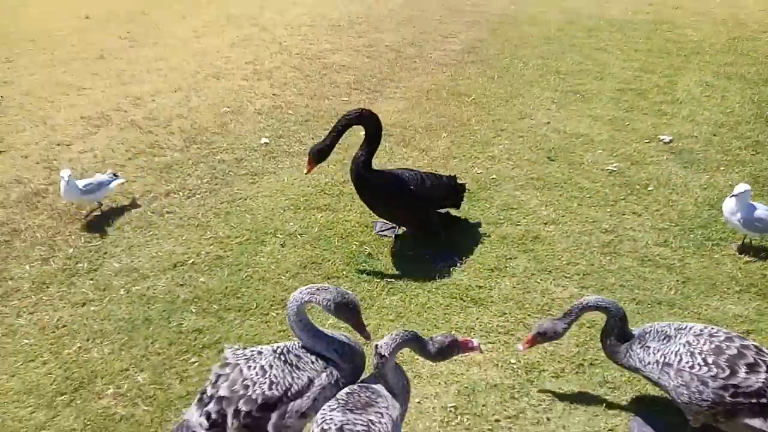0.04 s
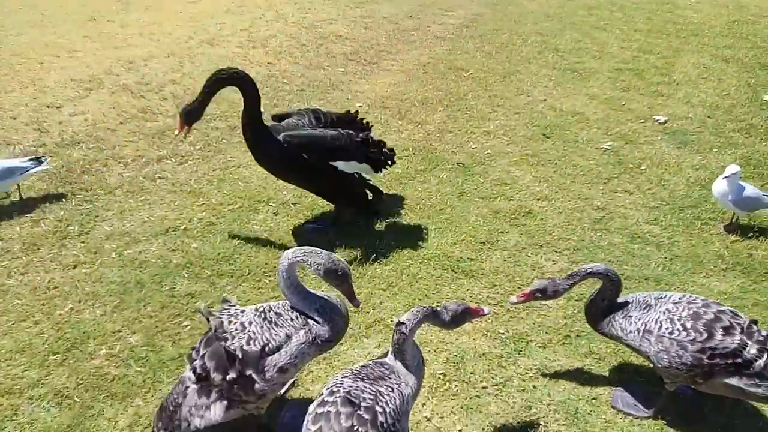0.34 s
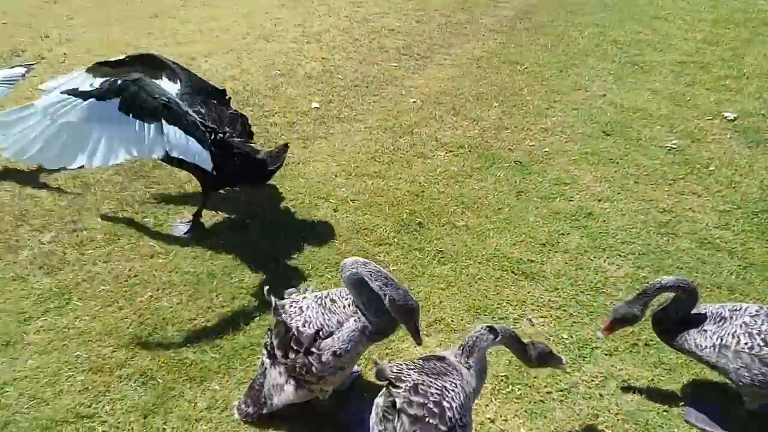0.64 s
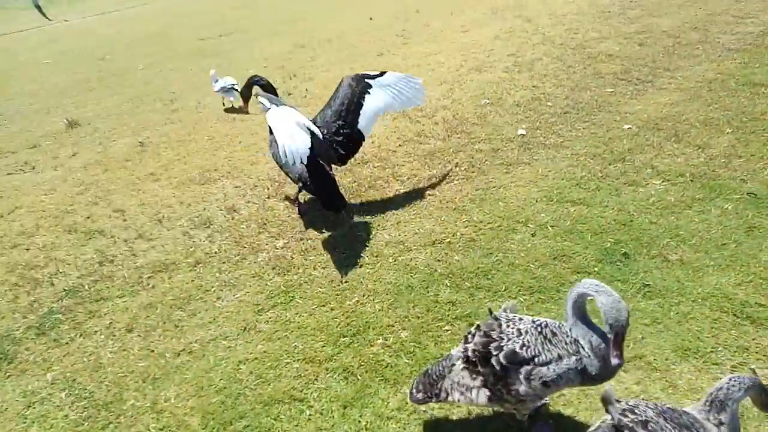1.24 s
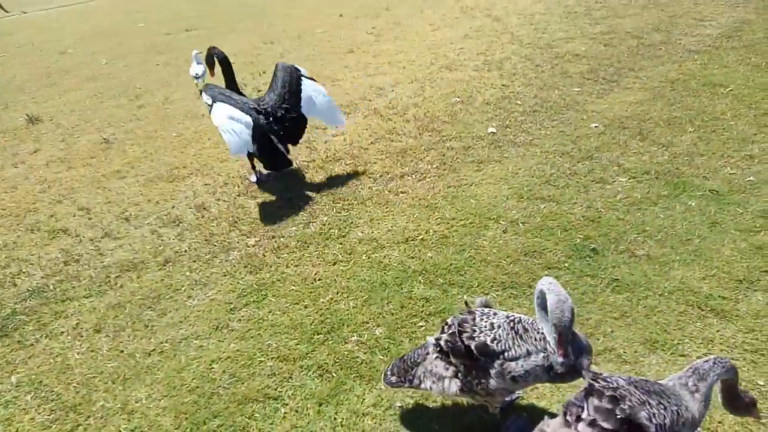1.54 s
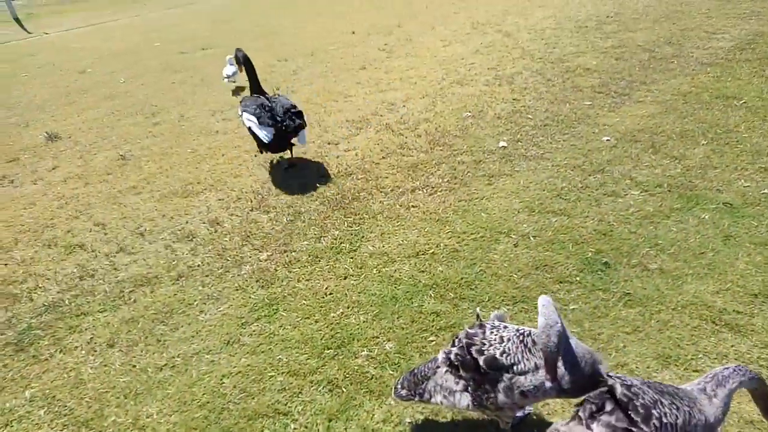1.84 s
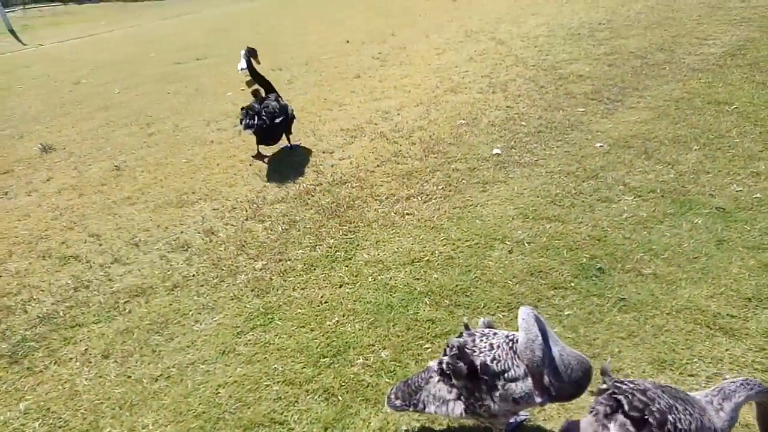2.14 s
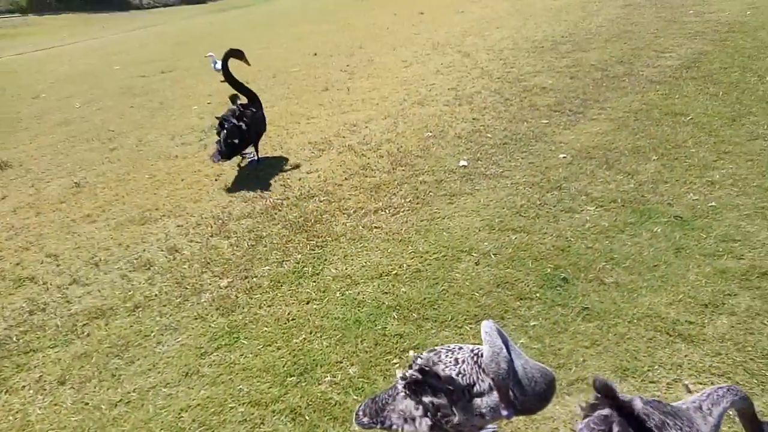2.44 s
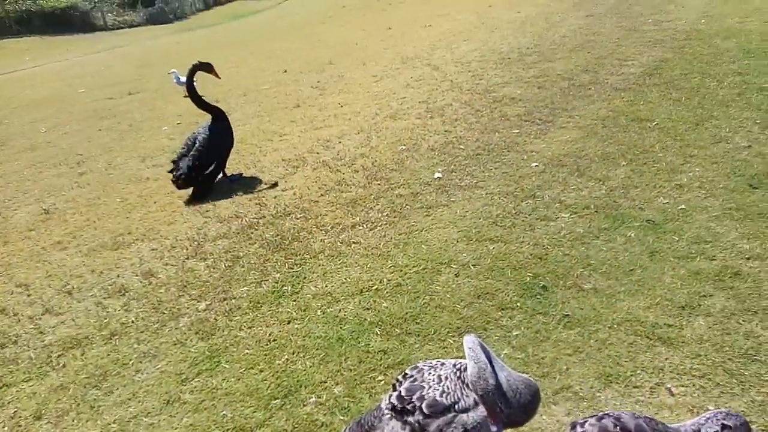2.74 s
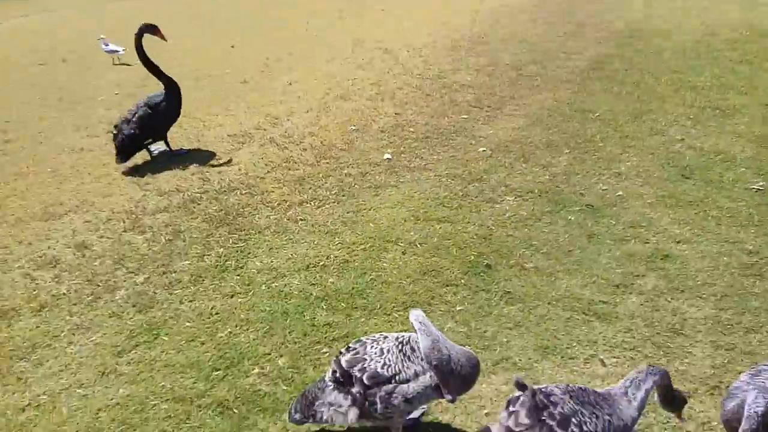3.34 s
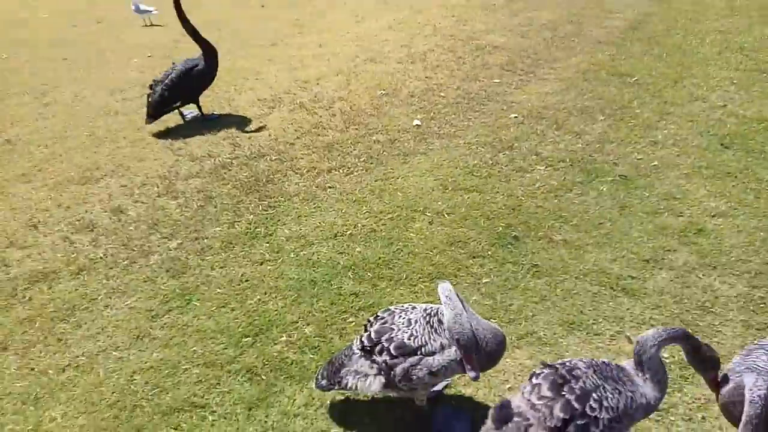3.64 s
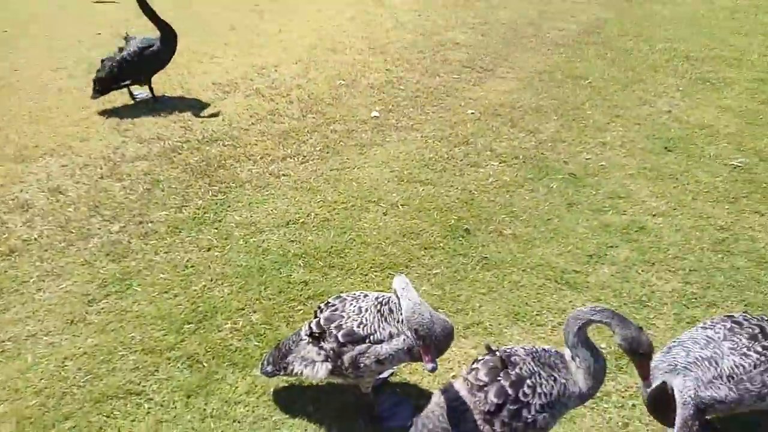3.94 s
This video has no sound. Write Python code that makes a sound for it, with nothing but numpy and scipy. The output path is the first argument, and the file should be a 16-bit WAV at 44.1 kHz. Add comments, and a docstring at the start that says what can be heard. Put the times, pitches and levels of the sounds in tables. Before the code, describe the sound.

A gull gives rasping trills as wind buffets the microphone and feathers rustle.

```python
"""Gulls and black swans on a windy lawn

On the left a gull gives three rasping trills, each a train of tiny bursts, and one faster squeal.
A swan pipes two soft notes that rise and fall, and a farther bird whistles near the end.
Wings and feet crackle over dry grass. Swirls of wind rumble and thump on the left and right
microphones, dropping briefly in the middle."""
import sys
import numpy as np
from scipy import signal
from scipy.fft import rfft, irfft, next_fast_len
from scipy.io import wavfile

SR = 44100
rng = np.random.default_rng(int(sys.argv[2]) if len(sys.argv) > 2 else 0)


def generate_wav(sig):
    """Save sig (samples, or channels by samples) to the path in sys.argv[1] as 16-bit PCM at SR."""
    pcm = np.round(np.clip(np.atleast_2d(sig).T, -1, 1) * 32767).astype(np.int16)
    wavfile.write(sys.argv[1], SR, pcm)


N = 176400
T = np.arange(N) / SR

# How hard the wind blows: time_s, level_db
WIND_STRENGTH = [(0, -24), (.2, -22.5), (.55, -22.5), (.63, -30), (.75, -17.5), (1.0, -28), (1.3, -22),
                 (1.5, -26), (1.57, -37), (1.66, -24.5), (1.75, -50), (2.0, -44.5), (2.14, -46),
                 (2.27, -28.5), (2.5, -21), (2.9, -20.5), (3.25, -20.5), (3.35, -23), (3.55, -24),
                 (3.7, -28.5), (3.81, -21.5), (4, -26.5)]


def amp(db):
    """Turns decibels into a gain to multiply by."""
    return 10 ** (np.asarray(db) / 20)


def unit(x):
    """Scales a signal to an average (rms) level of 1."""
    return x / np.sqrt(np.mean(x ** 2) + 1e-20)


def along(table, at):
    """Looks up places in a table's first column and reads the others, gliding between rows."""
    first, *rest = np.transpose(table)
    return [np.interp(at, first, column) for column in rest]


def add(mix, start_s, sound):
    """Lays a sound into the mix at its start time."""
    part = mix[..., max(round(start_s * SR), 0):][..., :sound.shape[-1]]
    part += sound[..., :part.shape[-1]]


def colour(x, points):
    """Shapes the lows and highs of a sound by rows of frequency_hz, gain_db."""
    hz, db = np.transpose(points)
    size = next_fast_len(x.shape[-1] + 4096)
    f = np.fft.rfftfreq(size, 1 / SR)
    gain = amp(np.interp(np.log(f + 1), np.log(hz), db))
    return irfft(rfft(x, size) * gain, size)[..., :x.shape[-1]]


def wobble(hz, size=N):
    """A random wiggle, up to about the given rate."""
    f = np.fft.rfftfreq(size, 1 / SR)
    return unit(irfft(rfft(rng.standard_normal(size)) / (1 + (f / hz) ** 4), size))


def air():
    """A faint, steady outdoor hush."""
    # Tone of calm air: frequency_hz, gain_db
    hush_tone = [(100, 8.5), (500, -1), (1000, -4), (2000, 5.5), (5000, -36), (8000, -53)]
    return amp(-57.5) * unit(colour(rng.standard_normal((2, N)), hush_tone))


def wind():
    """Swirling air gives each microphone its own lumpy rumble and a higher roar."""
    # Tone of the rumble: frequency_hz, gain_db
    rumble_tone = [(12, -50.5), (20, -6.5), (32, -20), (85, 0), (108, 1.5), (252, -4), (329, -8.5),
                   (500, -19.5), (650, -34), (1100, -120)]
    # Tone of the roar: frequency_hz, gain_db
    roar_tone = [(200, -30.5), (380, 3), (600, 0), (900, -9.5), (1400, -24.5), (2500, -34.5), (5000, -35.5),
                 (8000, -60)]
    # Strength of the roar: time_s, level_db
    roar_strength = [(0.0, -28), (0.07, -41), (0.09, -41), (0.17, -29), (0.32, -43), (0.57, -40),
                     (0.58, -29), (0.61, -70), (0.73, -45), (1.94, -50.5), (2.39, -42), (2.48, -36),
                     (2.95, -29), (3.1, -22.5), (3.15, -43), (3.23, -26.5), (3.35, -44), (3.49, -34),
                     (3.52, -57), (3.78, -51.5), (3.79, -33.5), (4.0, -53)]
    # Which side the wind hits harder: time_s, left_minus_right_db
    wind_side = [(0, -9), (.4, 8.5), (.6, -4.5), (1.0, -23), (1.4, 1.5), (1.6, 17), (1.9, 8), (2.3, -4),
                 (2.6, 6.5), (2.9, 2), (3.1, 13.5), (3.6, 1.5), (4, 16)]
    rumble_db, = along(WIND_STRENGTH, T)
    roar_db, = along(roar_strength, T)
    side_db, = along(wind_side, T)
    mics = []
    for sign in 1, -1:
        swirls = np.clip(wobble(hz=45), -2, 2)
        share = np.sqrt(2 / (1 + amp(-2 * sign * side_db)))
        rumble = unit(colour(rng.standard_normal(N) * amp(3.5 * swirls), rumble_tone))
        roar = unit(colour(rng.standard_normal(N) * amp(5 * swirls), roar_tone))
        mics.append(share * (amp(rumble_db + 4.5) * rumble + amp(roar_db + 2) * roar))
    return np.array(mics)


def wind_pops():
    """Small swirls hit a microphone as sharp spikes of pressure, louder in stronger wind."""
    # Tone of a pop: frequency_hz, gain_db
    pop_tone = [(30, -24), (100, 3.5), (1200, -3), (2200, -12.5), (5000, -22.5), (8000, -41.5)]
    pops_per_s, width_s, rebound_s = 41, .00078, .0027
    t = np.arange(-.02, .02, 1 / SR)
    spike = np.exp(-abs(t) / width_s) - width_s / rebound_s * np.exp(-abs(t) / rebound_s)
    extra_db = 3 * np.minimum(rng.exponential(1, (2, N)), 3)
    strength = amp(7.5 + along(WIND_STRENGTH, T)[0] + extra_db)
    hits = strength * (rng.random((2, N)) < pops_per_s / SR) * rng.choice([-1, 1], (2, N))
    return colour(signal.oaconvolve(hits, spike[None], "same", axes=1), pop_tone)


def wind_thumps():
    """Single swirls of air thump the microphones with a puff of low noise."""
    # The thumps: peak_s, level_db, cutoff_hz, left_minus_right_db
    thumps = [(0.019, -13.5, 513, -8.5), (.049, -18.5, 814, -10.5), (0.371, -10, 247, 3.5),
              (0.537, -16.5, 583, -7), (.578, -16, 670, 8.5), (0.701, -20, 454, -6),
              (.81, -21.5, 500, -11.5), (.862, -19.5, 605, -8), (.91, -18.5, 580, -3.5),
              (0.986, -20, 467, -19), (1.342, -15.5, 253, -10.5), (1.628, -17, 295, 12.5),
              (1.657, -15, 249, 7), (1.884, -17, 218, -8), (2.059, -23, 222, -19.5), (2.529, -12, 453, 3.5),
              (2.756, -18, 655, 15.5), (2.835, -20.5, 635, 9.5), (2.997, -15.5, 744, 6),
              (3.036, -16.5, 810, 25.5), (3.075, -17.5, 880, 18), (3.097, -22.5, 1000, 29.5),
              (3.175, -18, 453, 2.5), (3.222, -16.5, 595, 3.5), (3.281, -22.5, 737, 15.5)]
    rise_s = .00357
    out, t = np.zeros((2, N)), np.arange(0, .1, 1 / SR)
    swell = t / rise_s * np.exp(1 - t / rise_s)
    f = np.fft.rfftfreq(len(t), 1 / SR)
    for peak_s, db, cutoff_hz, side_db in thumps:
        for mic, sign in zip(out, (1, -1)):
            low_noise = irfft(rfft(rng.standard_normal(len(t))) / (1 + (f / cutoff_hz) ** 3.51), len(t))
            puff = unit(swell * low_noise) * np.sqrt(np.mean(swell ** 2))
            add(mic, peak_s - rise_s, amp(db + sign * side_db / 2) * puff)
    return colour(out, [(25, -28), (60, 0), (120, 2), (4000, -5.5), (8000, -33)])


def rustle():
    """Wings and dry grass make clumps of tiny crackles over a soft swish, with a few sharp flicks."""
    # Strength of the rustle: time_s, level_db
    strength = [(0, -34), (.33, -44), (.58, -46), (.66, -37), (.7, -44), (.85, -53), (1.0, -63), (1.1, -50),
                (1.42, -44.5), (1.47, -40.5), (1.62, -38), (1.75, -39.5), (2.15, -37.5), (2.43, -36.5),
                (2.52, -44.5), (2.8, -44.5), (3.0, -55.5), (3.3, -59), (3.4, -40.5), (3.8, -42.5),
                (4, -50.5)]
    # Flicks of feathers and stalks: start_s, level_db
    flicks = [(0.324, -28.5), (.422, -29.5), (0.467, -28.5), (0.649, -26), (0.671, -19), (1.106, -36.5),
              (1.131, -35), (1.458, -26.5), (1.468, -26), (1.517, -25), (1.716, -17.5), (1.805, -20),
              (2.352, -20.5), (2.409, -20), (2.447, -21), (3.409, -25), (3.917, -31)]
    # Tone of the rustle: frequency_hz, gain_db
    rustle_tone = [(300, -10), (1000, -7), (2000, 0), (3000, 1.5), (4300, 2), (5500, -4.5), (7000, -15),
                   (8200, -32.5), (10500, -34.5), (15000, -30.5)]
    # How much weaker it is on the right: frequency_hz, gain_db
    right_shade = [(1000, -8.5), (3000, -15), (5000, -12.5), (8000, -9.5), (14000, -5.5)]
    clicks_per_s, crackle_fade_s, flick_fade_s = 50, .00088, .0018
    t = np.arange(0, .03, 1 / SR)
    crackles = np.zeros((2, N))
    for hz in np.linspace(1200, 15000, 28):  # each pitch gets its own random clicks
        sizes = amp(4.5 * np.minimum(rng.exponential(1, (2, N)), 4))
        clicks = sizes * (rng.random((2, N)) < clicks_per_s / SR)
        ring = np.exp(-t / crackle_fade_s) * np.sin(2 * np.pi * hz * t)
        crackles += signal.oaconvolve(clicks, ring[None], axes=1)[:, :N]
    clumps = unit(amp(3.5 * np.clip(wobble(hz=65), -2, 2)))
    swish = rng.standard_normal((2, N))
    out = amp(along(strength, T)[0]) * clumps * .71 * (unit(crackles) + swish)
    for start_s, db in flicks:
        add(out, start_s, amp(db) * np.exp(-t / flick_fade_s) * rng.standard_normal((2, len(t))))
    left, right = amp(9) * colour(out, rustle_tone)
    return np.array([left, colour(right, right_shade)])


def lawn(birds):
    """Calls from the left reach the right microphone late and shaded; the surroundings echo faintly."""
    # The right side compared with the left: frequency_hz, gain_db
    right_shade = [(800, 11.5), (1500, -14.5), (2450, -16), (3200, -11.5), (4200, -5), (7000, -7)]
    delay_s, echo_s, echo_db = .0003815, .33, -16.5
    right = colour(np.interp(T - delay_s, T, birds), right_shade)
    t = np.arange(0, .5, 1 / SR)
    tail = rng.standard_normal((2, len(t))) * amp(-60 * t / echo_s)
    tail /= np.linalg.norm(tail, axis=1, keepdims=True)
    echo = signal.fftconvolve(birds[None], tail, axes=1)[:, :N]
    return np.array([birds, right]) + amp([[echo_db], [echo_db - 3]]) * echo


def far_whistle():
    """A farther bird holds a thin, slightly wavering note."""
    # The note: time_s, level_db, pitch_hz
    whistle = [(3.78, -41.5, 2590), (3.86, -43.5, 2555), (3.95, -42, 2520), (3.99, -33.5, 2575),
               (4.0, -43, 2500)]
    db, pitch_hz = along(whistle, T)
    hz = pitch_hz * (1 + .007 * wobble(hz=236))
    return (T > whistle[0][0]) * amp(db) * np.sin(2 * np.pi * np.cumsum(hz) / SR)


def swan_pipes():
    """A swan's two close, nearly pure voices rise and fall together in pitch and level."""
    # The notes: start_s, length_s, level_db, top_hz, second_top_hz, second_offset_db
    notes = [(1.199, .15, -34.5, 1582, 1676, -5), (1.468, .148, -27.5, 1650, 1830, -8.5)]
    # Harmonics (tones at 1, 2 and 3 times the pitch): level_db
    harmonics = [0, -21, -21]
    arch, roughness = .19, .021
    out = np.zeros(N)
    for start_s, length_s, db, top_hz, second_top_hz, second_offset_db in notes:
        progress = np.arange(0, length_s, 1 / SR) / length_s
        for voice_hz, voice_db in (top_hz, db), (second_top_hz, db + second_offset_db):
            waver = roughness * wobble(hz=300, size=len(progress))
            hz = voice_hz * (1 - arch * (2 * progress - 1) ** 2 + waver)
            phase = 2 * np.pi * np.cumsum(hz) / SR
            tone = sum(amp(level) * np.sin(k * phase) for k, level in enumerate(harmonics, 1))
            add(out, start_s, amp(voice_db) * np.sin(np.pi * progress) * tone)
    return out


def gull_squeal():
    """A fast, hissy trill whose harmonics swell in turn within each beat."""
    # The squeal: time_s, level_db, pitch_hz, beats_per_s
    squeal = [(2.172, -25, 881, 71.4), (2.205, -21.5, 979, 76), (2.24, -17, 1030, 90),
              (2.265, -21.5, 1023, 82.5), (2.32, -19.5, 1012, 90.7), (2.39, -22.5, 958, 89),
              (2.42, -30, 944, 80), (2.47, -37, 902, 88)]
    # Harmonics from the second up: level_db, place_in_beat (0 to 1)
    harmonics = [(3, 0.57), (4, .35), (5, 0.55), (-9.5, 0.3), (-22.5, .55), (-46, 0.8)]
    roughness, swing, hiss_db = .017, .012, -7
    db, pitch_hz, beats_per_s = along(squeal, T)
    calling = (T > squeal[0][0]) & (T < squeal[-1][0])
    beat = np.cumsum(beats_per_s * calling) / SR + .12 * wobble(hz=75)
    hz = pitch_hz * (1 + roughness * wobble(hz=500) - swing * np.cos(2 * np.pi * beat))
    phase = 2 * np.pi * np.cumsum(hz) / SR
    swell = lambda place: (.5 + .5 * np.cos(2 * np.pi * (beat - place))) ** 1.2
    voice = sum(amp(level) * swell(place) * np.sin(k * phase)
                for k, (level, place) in enumerate(harmonics, 2))
    hiss_tone = [(1200, -35.5), (2600, -6), (3600, -2), (4300, -21), (6000, -14), (8000, -49)]
    hiss = unit(colour(rng.standard_normal(N), hiss_tone))
    return calling * amp(db) * (.57 * voice + amp(hiss_db) * swell(.33) * hiss)


def gull_burst(pitch_hz):
    """One beat of a rasp: the voice box's two sides slide upward in turn and beat against each other."""
    # The side that leads: progress (0 to 1), pitch_ratio, strength
    first_side = [(0, .9, .1), (.08, .94, .45), (.35, 1, 1), (.55, 1.03, .85), (.72, 1.12, .2), (1, 1.2, 0)]
    # The later, brighter side: progress (0 to 1), pitch_ratio, strength
    second_side = [(0, .76, 0), (.3, .8, .15), (.48, .89, .45), (.68, .97, .8), (.86, .87, .6),
                   (1, .8, .05)]
    length_s, pitch_spread, roughness = .0128, .007, .056
    progress = np.arange(0, length_s, 1 / SR) / length_s
    voices = []
    for side, third_gain in (first_side, 1), (second_side, 1.7):
        ratio, strength = along(side, progress)
        detune = pitch_spread * rng.standard_normal()
        waver = progress * roughness * wobble(hz=740, size=len(progress))
        phase = 2 * np.pi * np.cumsum(pitch_hz * ratio * (1 + detune + waver)) / SR
        tone = sum((third_gain if k == 3 else 1) * np.sin(k * phase) for k in range(1, 10))
        voices.append(strength * tone)
    first, second = voices
    hiss = .22 * unit(np.sin(np.pi * progress) * rng.standard_normal(len(progress)))
    return unit(first + second + .2 * first * second) + hiss


def gull_rasps():
    """Quick trains of short bursts ring through the gull's throat."""
    # One list for each call: time_s, level_db, pitch_hz
    calls = [
        [(.002, -37.5, 1480), (.07, -25.5, 1522), (.125, -21.5, 1556), (.165, -27.5, 1490), (.19, -39, 1450),
         (.31, -39.5, 1544)],
        [(1.745, -27.5, 1430), (1.80, -18.5, 1508), (1.87, -20.5, 1500), (1.95, -19.5, 1530), (2.01, -26, 1468),
         (2.08, -30.5, 1372), (2.17, -56.5, 1340)],
        [(3.438, -34.5, 1490), (3.458, -23, 1533), (3.55, -19, 1557), (3.64, -21, 1558), (3.685, -25.5, 1514),
         (3.735, -18, 1538), (3.79, -29.5, 1473), (3.84, -48, 1440)],
    ]
    # How the throat shapes the voice: frequency_hz, gain_db
    throat = [(500, -25), (900, -13.5), (1200, -21), (1550, -9.5), (2050, -2), (2400, 7), (2750, -4),
              (3100, -1), (3600, -3), (4350, -7.5), (4700, -11), (5000, -13.5), (5650, -15.5), (6200, -23),
              (7000, -27.5), (8000, -51.5), (15000, -53)]
    spacing_s, spread_db = .01945, .6
    out = np.zeros(N)
    for call in calls:
        for start_s in np.arange(call[0][0], call[-1][0], spacing_s):
            db, pitch_hz = along(call, start_s)
            add(out, start_s, amp(db + spread_db * rng.standard_normal()) * gull_burst(pitch_hz))
    return amp(6.5) * colour(out, throat)


def scene():
    """Birds on the lawn, their rustling, and the wind."""
    birds = gull_rasps() + gull_squeal() + swan_pipes() + far_whistle()
    return lawn(birds) + rustle() + wind() + wind_pops() + wind_thumps() + air()


def record(dry):
    """Softly squashes the hardest gusts, then cuts the highest treble."""
    ceiling, cutoff_hz = .85, 15800
    squashed = dry / (1 + (dry / ceiling) ** 4) ** .25
    treble_cut = signal.firwin(511, cutoff_hz, window=("kaiser", 9), fs=SR)
    return signal.oaconvolve(squashed, treble_cut[None], "same")


dry = scene()
out = record(dry)
generate_wav(out)
```